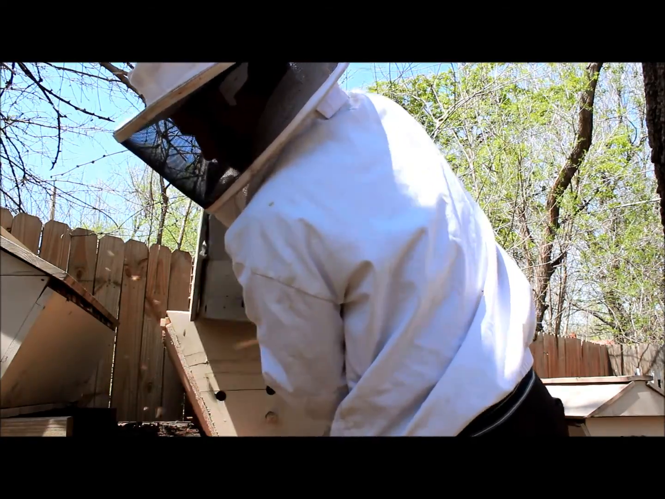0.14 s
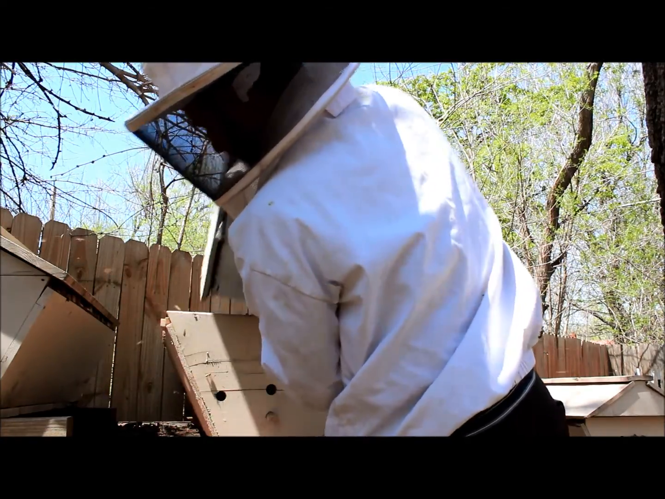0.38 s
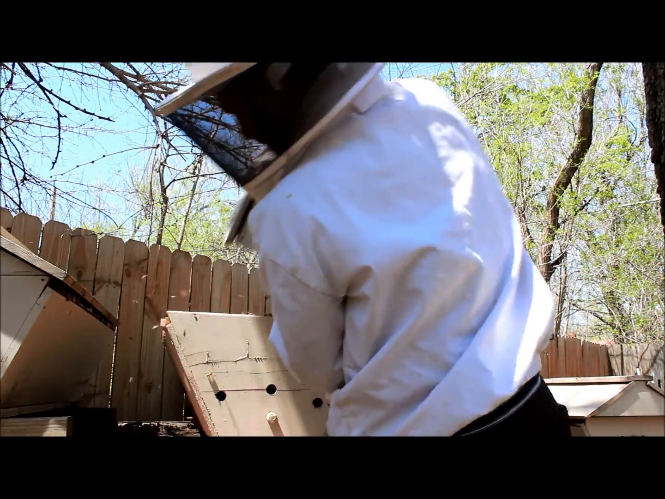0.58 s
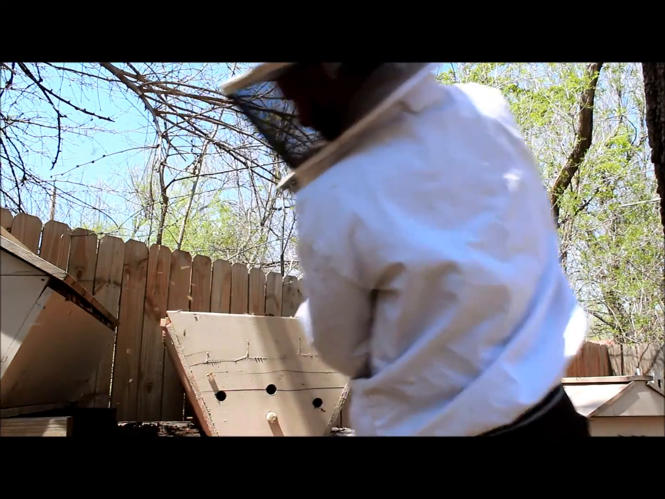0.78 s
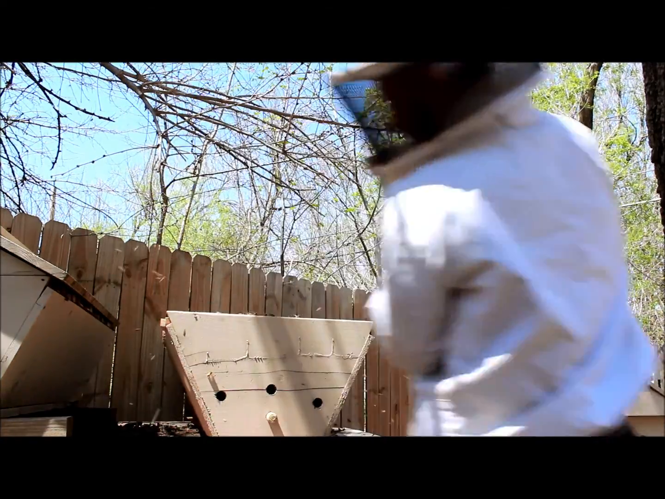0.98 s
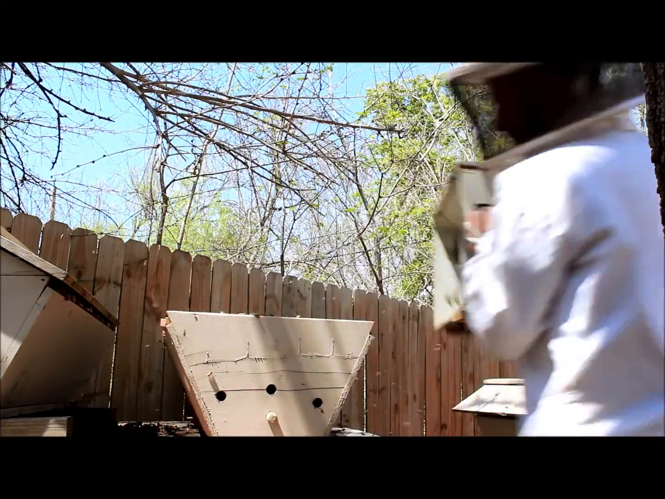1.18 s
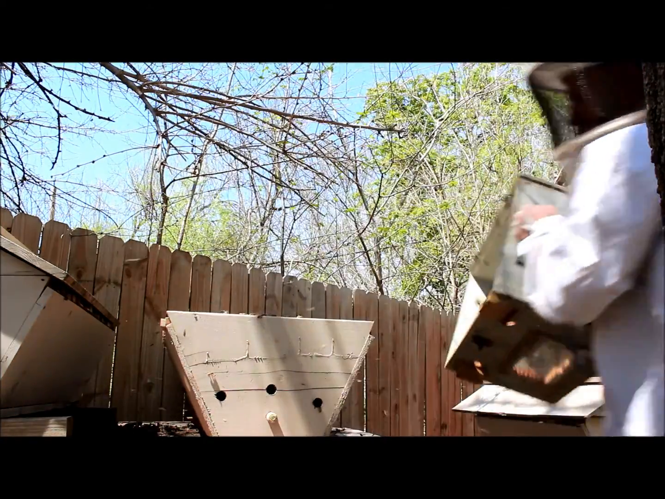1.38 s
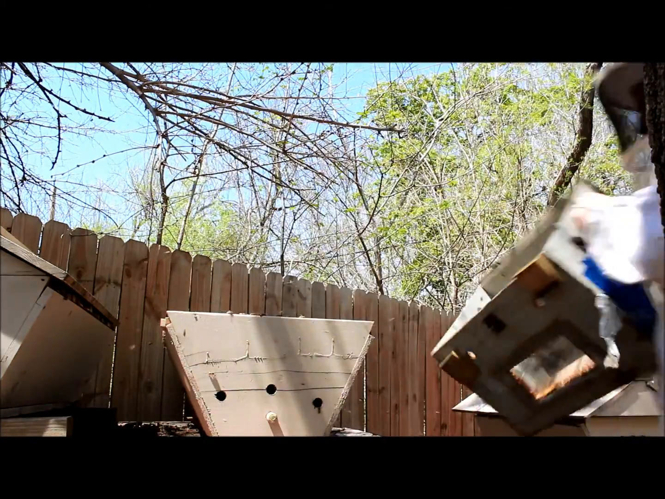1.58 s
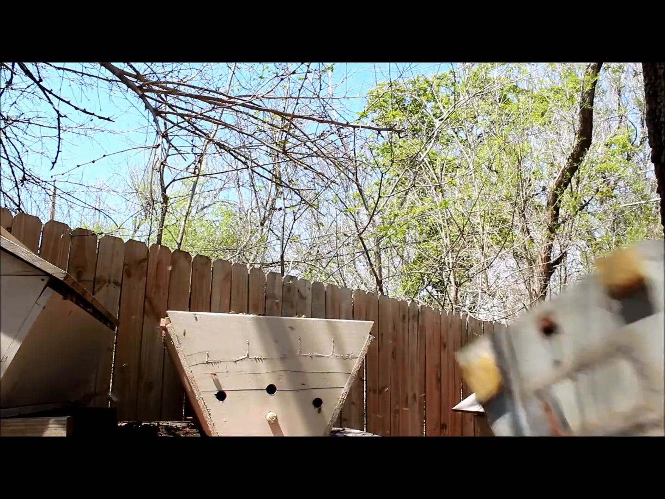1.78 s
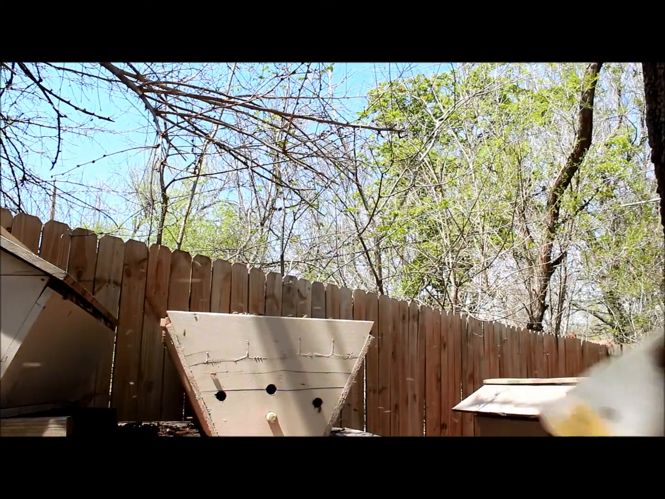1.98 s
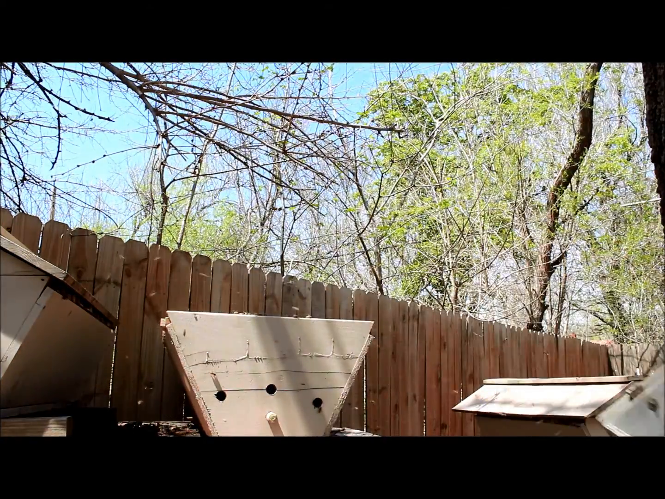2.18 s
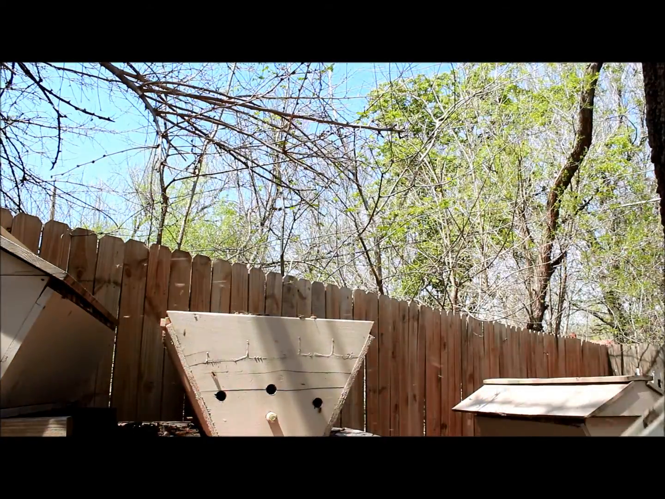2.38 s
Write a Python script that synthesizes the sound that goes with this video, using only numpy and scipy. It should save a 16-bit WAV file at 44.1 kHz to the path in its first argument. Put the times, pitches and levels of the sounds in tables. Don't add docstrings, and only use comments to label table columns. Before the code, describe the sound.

A close honey bee swarm buzzes while a wooden box bangs a hive and is set down

```python
import sys
import numpy as np
from scipy import signal
from scipy.io import wavfile
from scipy.ndimage import uniform_filter1d

SR = 44100
rng = np.random.default_rng(int(sys.argv[2]) if len(sys.argv) > 2 else 0)


def nominal_scale(level):
    x = np.asarray(level, float) / 20
    return 10 ** x


def store_pcm(level_fs):
    pcm = np.round(np.clip(level_fs, -1, 1) * 32767).astype(np.int16)
    wavfile.write(sys.argv[1], SR, np.atleast_2d(pcm).T)


N = 110250


def evened(x):
    return x / np.sqrt(np.mean(x ** 2) + 1e-20)


def drift(top_hz, count):
    t = np.linspace(0, N / SR, 400)
    f = np.geomspace(.2, top_hz, 16)[:, None]
    curves = []
    for _ in range(count):
        waves = np.sin(2 * np.pi * (f * t + rng.random(f.shape))) / np.sqrt(f)
        curves.append(np.interp(np.arange(N) / SR, t, evened(waves.sum(0))))
    return np.array(curves)


def resonate(x, hz, width):
    return signal.lfilter(*signal.iirpeak(hz, hz / width, SR), x)


def track(sound, rows, *body):
    mix = np.zeros(N)
    for start, *settings in rows:
        heard = sound(*body, *settings)
        part = mix[round(start * SR):][:len(heard)]
        part += heard[:len(part)]
    return mix


# (multiple of wingbeat rate, level [dB])
WINGBEAT = [(1, -4), (2, -3), (3, -10), (4, -8), (5, -7.5), (6, -9.5), (7, -17), (8, -15.5), (9, -20),
            (10, -24.5)]


def swarm():
    bees, wing_hz, swarm_db = 48, 232.3, -40.5
    spread, wander, near_spread_db = .085, .027, 2.5
    cycle = np.linspace(0, 1, 513)
    beat = sum(nominal_scale(db) * np.sin(2 * np.pi * round(k) * cycle + k * k) for k, db in WINGBEAT)
    own = spread * np.sqrt(3) * np.linspace(-1, 1, bees)[:, None]
    rate = wing_hz * (1 + own + wander * drift(12, bees))
    turns = np.cumsum(rate, 1) / SR + rng.random((bees, 1))
    near = nominal_scale(near_spread_db * drift(6.9, bees))
    return nominal_scale(swarm_db) * evened((np.interp(turns % 1, cycle, beat) * near).sum(0))


# (frequency [Hz], level [dB per Hz])
YARD_SPECTRUM = [(25, -27.5), (120, 3.5), (300, -8.5), (1200, -17), (2500, -20.5), (7000, -30.5),
                 (11000, -34.5), (16500, -32.5)]


def yard():
    yard_db, patchy_db, swell_db = -40, .5, .23
    frames, hz = N // 256 + 5, np.fft.rfftfreq(1024, 1 / SR)
    a, b, patches = rng.standard_normal((frames, 513, 3)).T
    patches = evened(uniform_filter1d(uniform_filter1d(patches, 12, 0), 14, 1))
    f, db = np.transpose(YARD_SPECTRUM)
    shape_db = np.interp(np.log(hz + 1), np.log(f), db)[:, None]
    spectra = (a + 1j * b) * nominal_scale(shape_db + patchy_db * patches)
    wash = signal.istft(spectra, nperseg=1024, noverlap=768)[1][:N]
    return nominal_scale(yard_db + swell_db * drift(2.9, 1)[0]) * evened(wash)


# (time [s], tone level [dB], octave level [dB])
MACHINE_LEVELS = [(0, -54, -56), (.5, -56, -51), (.75, -56, -47), (1.0, -58, -56), (1.6, -54, -50),
                  (2.0, -48, -54), (2.15, -41, -52), (2.5, -44, -48)]


def hum():
    hum_hz, pitch_wander, waver_db = 100.5, .008, 2.5
    wander, low_waver, high_waver = drift(7.7, 3)
    turn = 2 * np.pi * np.cumsum(hum_hz * (1 + pitch_wander * wander)) / SR
    s, low_db, high_db = np.transpose(MACHINE_LEVELS)
    t = np.arange(N) / SR
    tone = nominal_scale(np.interp(t, s, low_db) + waver_db * low_waver) * np.sin(turn)
    octave = nominal_scale(np.interp(t, s, high_db) + waver_db * high_waver) * np.sin(2 * turn)
    return tone + octave


def scrape(db, length, hz, width):
    fade_db, grain_db = -14, 3.0
    noise, grain = rng.standard_normal((SR // 2, 2)).T
    t = np.arange(len(noise)) / SR
    rub = noise * nominal_scale(grain_db * evened(uniform_filter1d(grain, 60)))
    for _ in range(5):
        rub = resonate(rub, hz, width)
    return nominal_scale(db + fade_db * (t / length) ** 2) * np.minimum(t / length / .043, 1) * evened(rub)


# (time [s], length [s], level [dB], centre [Hz], width [Hz])
SCRAPES = [(0.208, 0.06, -23.5, 1330, 2800), (0.209, 0.014, -37, 6250, 8000),
           (0.233, 0.012, -45, 8000, 12000), (0.258, 0.024, -36, 2860, 3480), (0.267, 0.16, -31, 212, 300),
           (0.285, 0.083, -49, 2480, 3930), (0.633, 0.042, -56, 6560, 2500),
           (1.299, 0.023, -42.5, 2420, 5900), (1.616, 0.058, -40, 2160, 4270),
           (1.769, 0.038, -50, 8200, 8000), (1.802, 0.049, -32, 3330, 4230),
           (2.002, 0.047, -35.5, 1487, 2850), (2.424, .04, -57, 7000, 2500), (1.512, 0.86, -49, 2370, 4140)]


def scrapes():
    return track(scrape, [(s, db, length, hz, width) for s, length, db, hz, width in SCRAPES])


def tick(db):
    t60 = .006
    t = np.arange(SR // 50) / SR
    return resonate(nominal_scale(db - 60 * t / t60) * rng.standard_normal(len(t)), 5400, 7300)


# (time [s], level [dB])
TICKS = [
    (.2088, -27),
    (0.2303, -14),
    (1.2972, -28.5),
    (1.3, -40),
    (1.307, -47),
    (1.766, -30),
    (0.473, -36.5),
]


def ticks():
    return track(tick, TICKS)


def knock(modes, db, rise, bright_db):
    wood_t60, t60_slope, mode_split = .105, -.28, .02
    t = np.arange(SR // 4) / SR
    split = 1 + mode_split * rng.uniform(-1, 1, (len(modes), 2, 1))
    ring = 0
    for pair, (hz, mode_db) in zip(split, modes):
        t60 = wood_t60 * (hz / 200) ** t60_slope
        level_db = mode_db + bright_db * np.log2(hz / 200) - 60 * t / t60
        ring = ring + nominal_scale(level_db) * np.sin(2 * np.pi * hz * pair * t).mean(0)
    return nominal_scale(db) * ring * np.minimum(t / rise, 1)


# (frequency [Hz], level [dB])
HIVE_MODES = [(130, -13), (165, 1.5), (200, 4), (250, 1.5), (320, 2.5), (365, 5), (410, -5.5), (455, -4),
              (500, -5.5), (770, -10), (830, -10.5), (900, -15), (1180, -21), (1604, -27)]
# (time [s], level [dB], rise [s], brightness [dB per octave])
HIVE_KNOCKS = [
    (0.2097, -7, 0.0018, 1.4),
    (0.2139, -3, 0.0022, 0.5),
    (.2275, -10.5, 0.0052, 6.5),
    (.24, -21, 0.0027, -6),
    (.262, -43, 0.0035, 16),
    (0.287, -51, 0.012, 0),
]


def hive_knocks():
    return track(knock, HIVE_KNOCKS, HIVE_MODES)


def fence(x):
    echo_db, echo_t60 = -24, .4
    t = np.arange(SR // 2) / SR
    tail = rng.standard_normal(len(t)) * (rng.random(len(t)) < .3)
    tail = tail * nominal_scale(-60 * t / echo_t60) * (t > .006)
    tail = signal.lfilter(*signal.butter(2, 1500, fs=SR), tail)
    return nominal_scale(echo_db) * signal.fftconvolve(x, tail / np.linalg.norm(tail))[:N]


# (frequency [Hz], level [dB])
BOX_MODES = [(220, 0), (258, 1.5), (292, -3), (335, -2), (430, -7.5), (600, -16.5), (765, -12.5),
             (1012, -20.5), (1750, -20.5), (2200, -28)]
# (time [s], level [dB], rise [s], brightness [dB per octave])
BOX_KNOCKS = [(1.2966, -59.5, .001, 14.5), (1.626, -30, 0.0053, 6.5), (1.652, -16, 0.01, -24),
              (1.762, -36, 0.0017, 7.5), (1.808, -27.5, 0.0021, 8), (1.829, -21, 0.0068, 3.5),
              (1.885, -14, 0.011, -22), (2.002, -18.5, 0.0036, 4.53), (2.016, -2.5, 0.017, -9.5),
              (2.046, -25, 0.0072, 4), (2.189, -38, 0.0043, -2.5), (2.457, -30.5, 0.0083, 2.5)]


def box_knocks():
    return track(knock, BOX_KNOCKS, BOX_MODES)


SQUEAK_OVERTONES = [-23, -42, -42]


def squeak(length, db, hz, throbs):
    sag, fade_db, throb_depth = .012, -14, .8
    t = np.arange(0, length, 1 / SR)
    turn = 2 * np.pi * np.cumsum(hz * (1 - sag * t / length)) / SR
    tone = np.sin(turn) + sum(nominal_scale(d) * np.sin((k + 2) * turn) for k, d in enumerate(SQUEAK_OVERTONES))
    throb = 1 - throb_depth * np.cos(np.pi * throbs * t) ** 2
    return nominal_scale(db + fade_db * t / length) * throb * np.sin(np.pi * t / length) ** .1 * tone


# (time [s], length [s], level [dB], pitch [Hz], throbs [per s])
SQUEAKS = [
    (1.733, .032, -19, 3160, 112),
    (1.808, .021, -25, 3080, 90),
    (1.848, .011, -40, 5000, 70),
    (1.848, .015, -48, 12950, 60),
    (1.803, .03, -47, 9200, 30),
]


def squeaks():
    return track(squeak, SQUEAKS)


# (frequency [Hz], level [dB])
LID_MODES = [(760, -12), (1005, 2.5), (1400, -6), (1560, -2.5), (2100, -10), (2500, -11), (3150, -10),
             (4090, -11), (4650, -14), (5400, -15), (6100, -17)]
# (time [s], level [dB], rise [s], brightness [dB per octave])
LID_KNOCKS = [
    (1.7985, -22, 0.001, 0.35),
    (1.807, -28.5, 0.0015, 2.85),
    (1.816, -53, .002, 8),
]


def lid_knocks():
    return track(knock, LID_KNOCKS, LID_MODES)


def scene():
    work = scrapes() + ticks() + hive_knocks() + box_knocks() + squeaks() + lid_knocks()
    work = signal.lfilter(*signal.butter(2, 90, "high", fs=SR), work)
    return (swarm() + yard() + hum() + work + fence(work))[None]


def low_pass(x):
    return signal.sosfilt(signal.butter(12, 16860, fs=SR, output="sos"), x)


def record(dry):
    duck_from_db, duck_share, back_db_per_s, clip = -19, .6, 42, 1.0
    smooth = [1 / 800], [1, 1 / 800 - 1]
    power_db = 10 * np.log10(signal.lfilter(*smooth, dry[0] ** 2) + 1e-12)
    fall = np.arange(N) * back_db_per_s / SR
    held_db = np.maximum.accumulate(power_db + fall) - fall
    over_db = np.maximum(held_db - duck_from_db, 0)
    duck_db = signal.lfilter(*smooth, duck_share * over_db)
    loud = np.clip(dry / nominal_scale(duck_db), -clip, clip)
    edge = signal.firwin(1023, 15780, window=("kaiser", 9), fs=SR)[None]
    return low_pass(signal.oaconvolve(loud, edge, "same"))


dry = scene()
out = record(dry)
store_pcm(out)
```